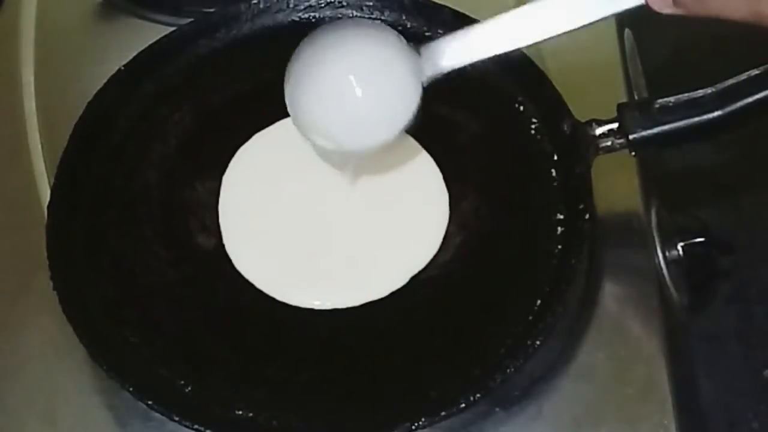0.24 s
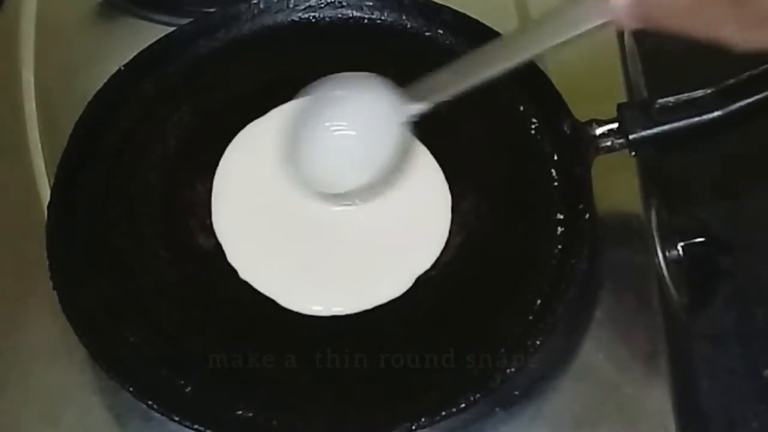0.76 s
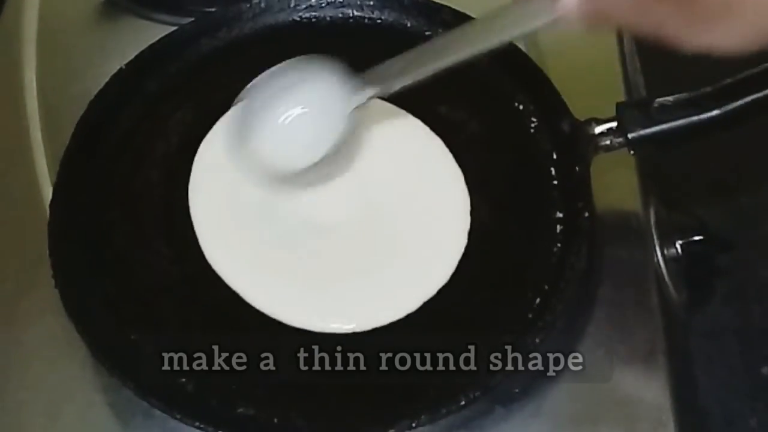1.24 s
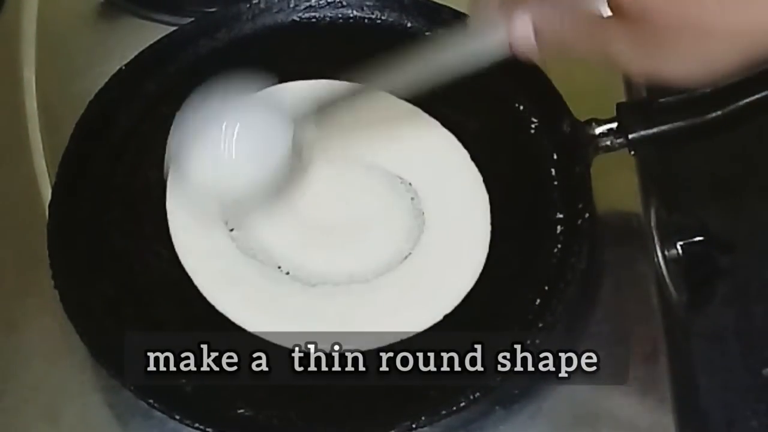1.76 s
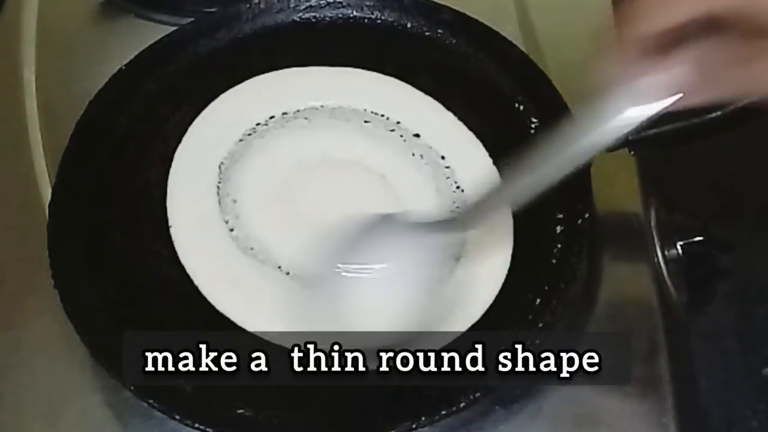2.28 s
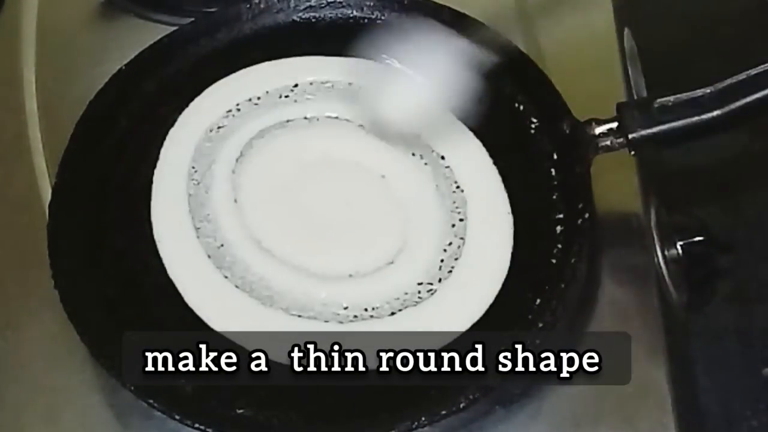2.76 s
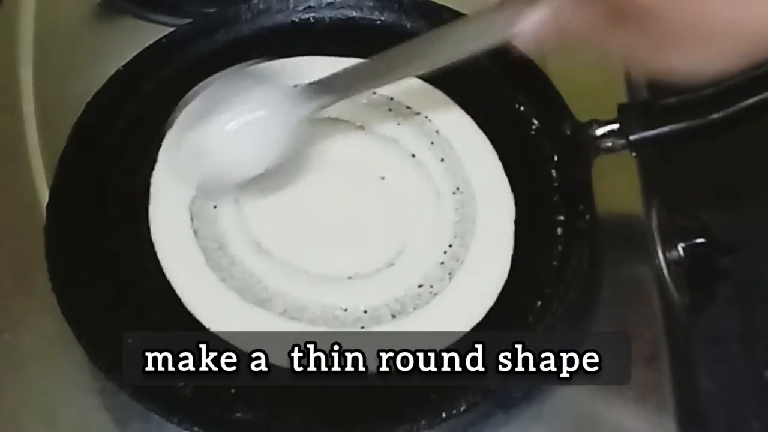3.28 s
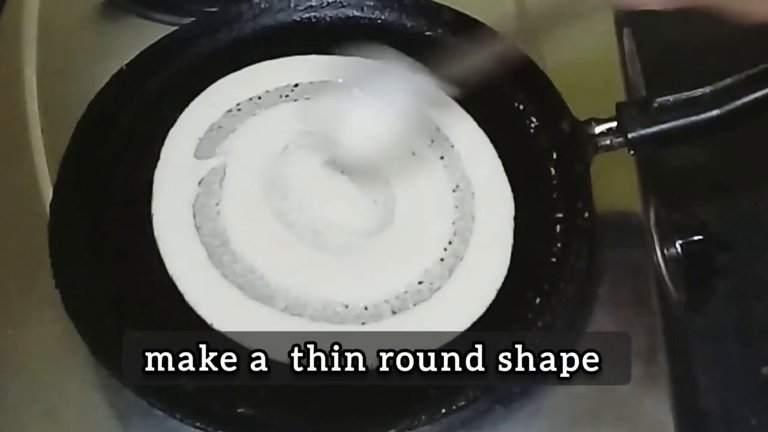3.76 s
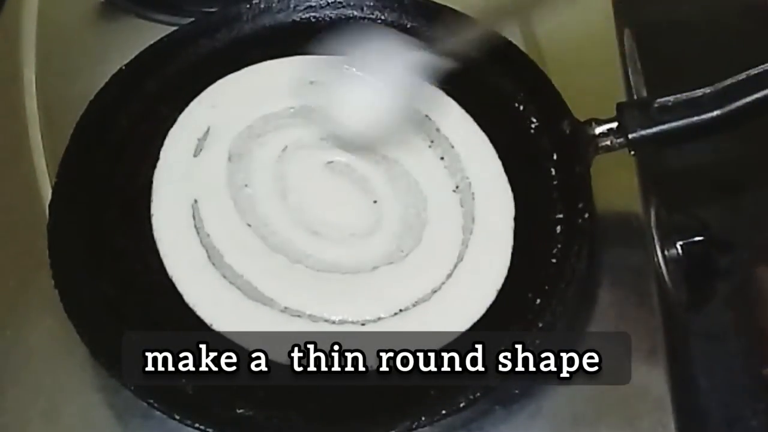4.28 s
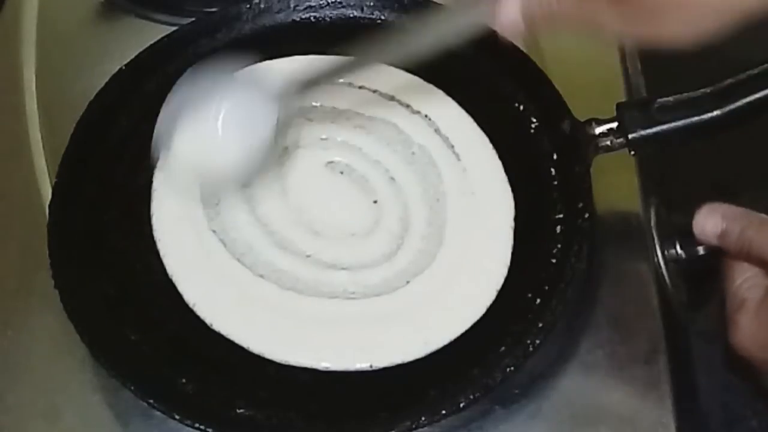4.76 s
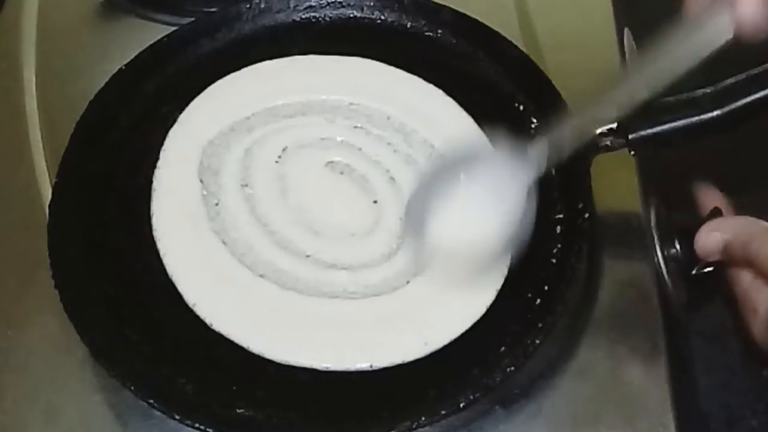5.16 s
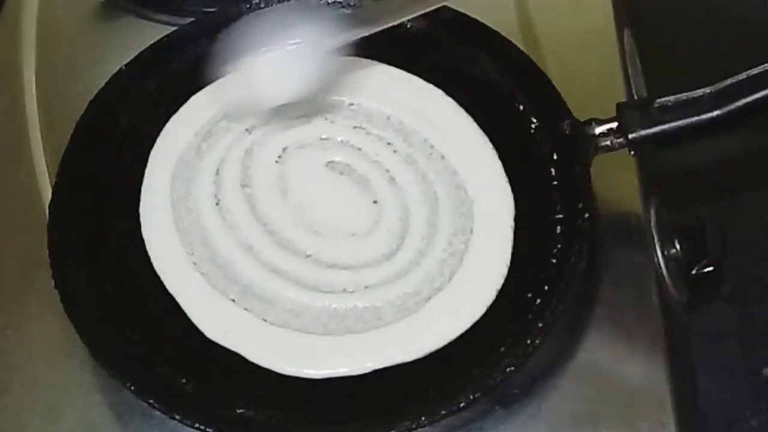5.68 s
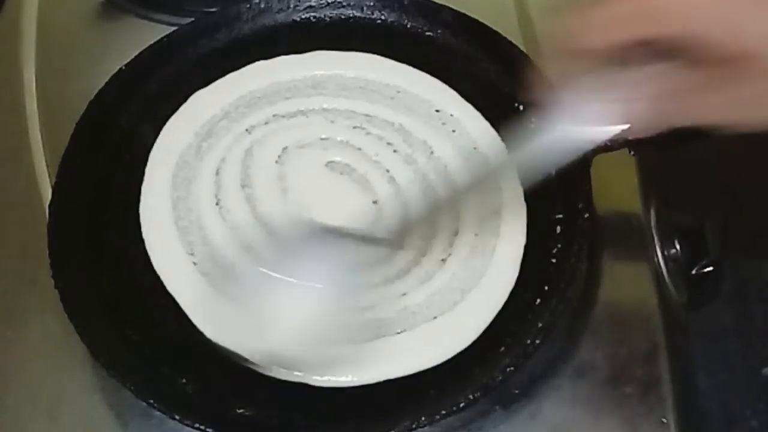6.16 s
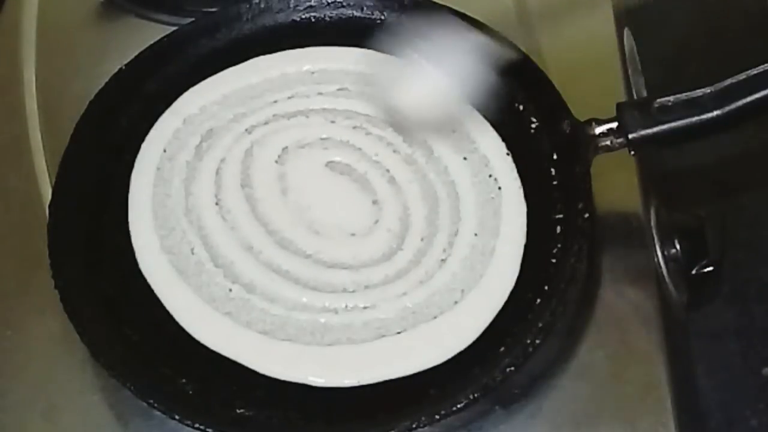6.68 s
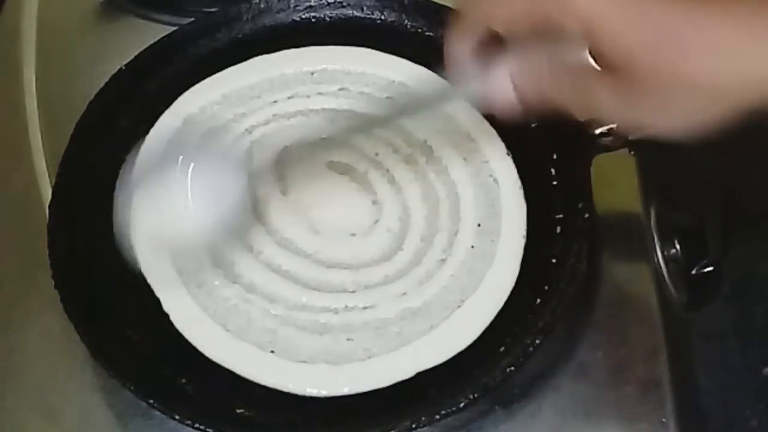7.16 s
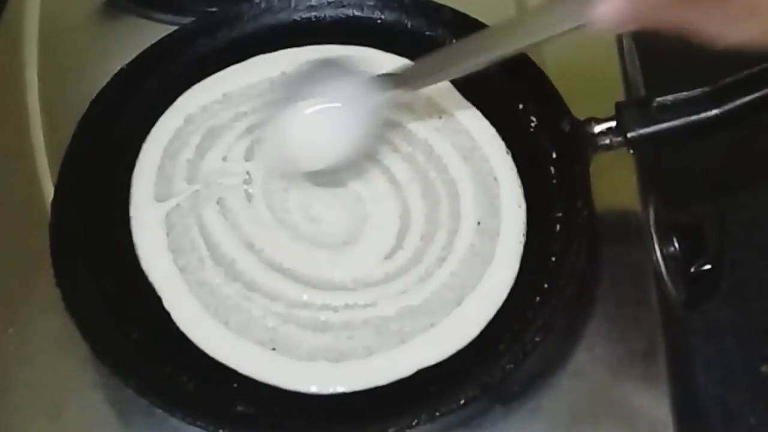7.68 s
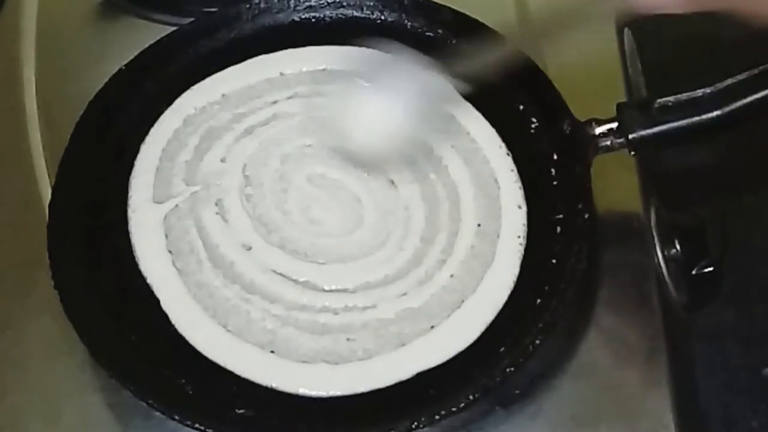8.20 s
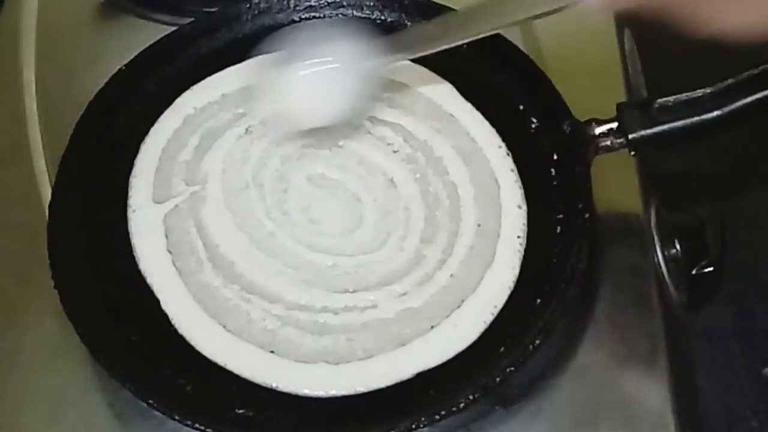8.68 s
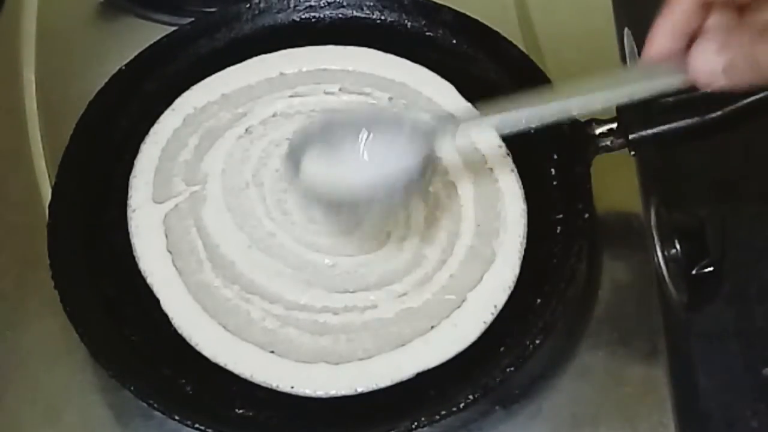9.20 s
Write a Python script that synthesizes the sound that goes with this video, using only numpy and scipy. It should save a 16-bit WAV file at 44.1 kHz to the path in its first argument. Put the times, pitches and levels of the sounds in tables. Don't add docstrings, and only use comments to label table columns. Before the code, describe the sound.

Close wet sizzling surges as batter spreads on hot iron, dies away, returns more softly in circular strokes, and ends in small dry ticks.

```python
import sys
import numpy as np
from scipy import signal
from scipy.fft import rfft, irfft, next_fast_len
from scipy.io import wavfile
from scipy.ndimage import uniform_filter1d, map_coordinates

SR = 44100
rng = np.random.default_rng(int(sys.argv[2]) if len(sys.argv) > 2 else 0)


def generate_wav(sig):
    pcm = np.round(np.clip(np.atleast_2d(sig).T, -1, 1) * 32767).astype(np.int16)
    wavfile.write(sys.argv[1], SR, pcm)


def amplitude_ratio(level_db):
    exponent = np.asarray(level_db, float) / 20
    return 10 ** exponent


N = 415863

# pitch_hz, density_db (per Hz)
KITCHEN_SPECTRUM = [(105, -25.5), (140, 1), (190, -14.5), (300, -2.5), (480, -16), (600, 2.5), (780, -6),
                    (900, -23.5), (1400, -22), (3000, -34.5)]
# start_s, peak_db, upper_db, lower_db
KNOCKS = [(0.056, -61, -0.5, -6), (0.092, -32.5, 5, -3.5), (0.199, -69, 28, -30), (1.028, -93, 39, -16),
          (1.278, -56, 4, -2), (1.5, -56, 8, -27), (1.692, -63, 5, -36), (1.545, -61, 0, -25),
          (1.6, -72, 8, -25), (1.778, -61, -15, -31), (1.85, -64, -11, -22), (1.909, -69, -11, -21),
          (2.163, -56, -21, -23), (2.289, -62, 0, -6), (2.554, -59, 16, -39), (2.83, -61, -18, -13),
          (3.013, -60, -25, -41), (3.27, -63, -30, -16), (3.33, -74, -20, -15), (3.846, -66, -42, -18),
          (4.051, -78, -20, -15), (4.44, -81.5, -1, -25), (5.062, -57, -3, -6), (5.089, -45, 1, 1),
          (5.139, -51, 1, -1), (5.181, -39, -15, -10), (5.342, -41, -32, -5), (5.379, -51, -25, -10),
          (5.518, -48, -36, -42), (5.571, -65, -30, -32), (5.633, -57, -29, 1), (5.747, -39, -36, -1),
          (5.876, -48.5, -2, 0), (6.026, -46, -7.5, -2), (6.09, -70, -15, 12), (6.394, -54.5, -40, 4),
          (6.538, -47, -54, -13), (6.6, -59, -30, -16), (6.718, -44.5, 1.5, -0.5), (6.78, -63, -20, 7),
          (6.923, -62, -23, -7), (7.162, -63, -35, -15), (7.348, -55, -33, -23), (7.599, -59, -8, -20),
          (7.633, -46, -12, -17), (8.066, -60, -39, -27)]
# start_s, level_db
FOOTSTEPS = [(.1, -59), (1.129, -62), (1.499, -77), (1.64, -87), (1.71, -78), (1.77, -84), (1.19, -62),
             (1.41, -87), (5.875, -75), (6.099, -76), (6.279, -65), (6.716, -84)]
# start_s, push_db
LADLE_BOUNCES = [
    (.0905, 27.5),
    (.0995, 25),
    (.119, 25.5),
    (.134, 16.5),
    (.142, 14.5),
    (.149, 15.5),
    (.160, 20.5),
    (.170, 16),
    (.203, 4),
]
# pitch_hz, width_hz, level_db
STAND_MODES = [(193, 108, -4.5), (239.5, 58, 5), (279, 71, -4.5)]
# pitch_hz, width_hz, level_db
UPPER_STAND_MODES = [(322, 130, 15), (447, 69, 14.5)]
# pitch_hz, width_hz, level_db
PAN_RING_MODES = [(655, 101, -0.5)]
# start_s, peak_db
FAT_SPARKS = [(3.4101, -35), (3.4956, -34), (3.5026, -31.5), (3.606, -37), (3.7882, -37), (3.833, -24.5),
              (4.0312, -39.5), (4.1283, -41), (4.1918, -43.5), (4.3993, -42.5), (4.4772, -36.5),
              (4.6373, -45.5), (4.759, -41), (4.7904, -37.5), (4.9755, -36.5), (5.414, -38.5),
              (5.7004, -25.5), (6.3873, -32.5), (6.7665, -29.5), (7.2773, -37.5), (7.399, -35.5),
              (7.5512, -37.5), (7.6465, -38.5), (7.7956, -34), (7.9081, -44), (7.9088, -37.5),
              (7.9667, -34), (7.9994, -39.5), (8.0072, -34.5), (8.2177, -39.5), (8.2234, -30.5),
              (8.2923, -38.5), (8.3855, -38.5), (8.5364, -42), (8.591, -41), (8.6327, -46.5),
              (8.6871, -41.5), (8.716, -40.5), (8.744, -38), (8.8063, -37.5), (8.9679, -50),
              (9.0378, -42.5), (9.0533, -35), (9.171, -43), (9.3616, -38.5)]
# start_s, peak_db
DROPLETS = [(3.4104, -28), (3.6576, -27), (4.393, -32), (4.6371, -32.5), (4.9307, -42), (5.036, -41),
            (8.2784, -30.5), (8.457, -33.5), (8.4632, -35), (8.4684, -33.5), (8.4943, -35), (8.4957, -29),
            (8.5434, -32), (8.556, -41.5), (8.6544, -34), (8.7364, -31.5), (8.7444, -38), (8.8153, -33.5),
            (8.8718, -33), (9.0264, -42), (8.9679, -41.5), (9.1708, -45), (9.197, -43.5), (9.311, -44.5),
            (9.322, -42.5), (9.331, -41)]
# start_s, peak_db, body_db
BUBBLES = [(0.4608, -23, -20.5), (0.479, -16.5, -21), (2.1015, -11, -20.5), (2.2404, -17.5, -7),
           (3.5027, -21.5, -20.5), (3.7883, -36, -16.5), (3.8318, -22.5, -30), (4.0322, -32.5, -17.5),
           (4.482, -28.5, -14), (4.7905, -45, -24), (4.884, -37.5, -21), (4.9747, -31.5, -26),
           (5.3447, -47, -20), (5.3737, -41, -28), (5.4146, -33, -21.5), (6.767, -32, -7.5),
           (7.9098, -26, -28.5), (8.219, -30, -24), (8.293, -32.5, -12), (8.3858, -39.5, -14),
           (8.5276, -34, -23), (8.6867, -35, -13), (8.7166, -35.5, -12.5), (8.8054, -35.5, -2.5),
           (8.489, -36.5, -15), (9.0536, -34, -14.5), (9.196, -39, -10), (9.2596, -40, -25.5),
           (9.3217, -36.5, -29), (9.3617, -36.5, -12)]
# start_s, steam_db, hum_over_steam_db
BOILING = [(0, -33, -7), (.45, -38, -10.5), (.68, -37.5, -34.5), (.88, -28.5, -13.5), (1.0, -26.5, -8.5),
           (2.2, -30.5, -4.5), (2.95, -28.5, -7), (3.35, -36.5, -14), (3.9, -43, -36), (4.75, -53.5, -58),
           (5.1, -53.5, -25.5), (5.27, -65.5, -21), (5.55, -39.5, -86), (5.67, -37, -10.5),
           (6.9, -34.5, -18.5), (7.2, -37, -24), (8.2, -48, -56), (9.43, -59.5, -40.5)]
# centre_s, half_length_s, steam_gain_db, hum_gain_db
LADLE_PASSES = [(0.098, .02, -2, 0), (.3, .1, 0, 1), (0.613, 0.039, -1, 7.5), (0.816, 0.038, 1, 0.5),
                (1.024, 0.044, 1, 1.5), (1.555, 0.12, 2.5, -2.5), (1.724, .06, 0, 2.5),
                (1.934, 0.096, 1, -6), (2.13, 0.18, 4.5, -6.5), (2.727, 0.18, 1.5, -8.5),
                (3.489, 0.089, 0.5, 6), (3.736, 0.049, 1, 17.5), (4.281, 0.061, -1, 26),
                (4.441, 0.19, 4.5, 7), (4.866, 0.017, -1, 0), (5.298, 0.04, -3.5, 0), (5.47, 0.036, 1, -7),
                (5.634, 0.037, 2.5, 6), (5.713, 0.062, 2.5, 2), (5.859, 0.16, -1.5, -12.5),
                (5.97, 0.2, 6, 2), (6.013, 0.025, 0, 8.5), (6.26, 0.09, -0.5, 6), (6.551, 0.12, 3.5, -5.5),
                (6.647, 0.056, 1, -6), (6.746, 0.12, 2.5, -0.5), (6.894, 0.03, 0.5, 6.5),
                (7.04, 0.034, -0.5, 4), (7.154, 0.089, -0.5, -8), (7.404, 0.18, 2, -0.5),
                (7.763, 0.075, 3.5, 7), (8.061, 0.11, 2.5, -3), (8.38, 0.047, -1.5, 3),
                (8.47, .03, -2.5, 0), (8.727, 0.18, 2.5, -2.5), (8.94, 0.097, -2, -5),
                (9.066, 0.034, 2, -3), (9.236, 0.044, 1.5, 2)]
# start_s, gain_db
SHADING = [(0, 2), (.6, 4), (.78, 4), (1.15, 2), (1.34, 0.5), (1.57, 1.5), (1.73, 2), (1.8, 2), (2.9, -1),
           (4.5, -1), (5.65, 5), (5.78, -0.5), (5.88, 2.5), (6.3, 1.5), (6.54, 3.5), (6.6, -0.5),
           (7.6, -1.5), (8.25, 2.5)]
# pitch_hz, density_db (per Hz)
STEAM_SPECTRUM = [(760, -34.5), (1300, -8), (1550, 2), (1630, -2), (2030, 2), (2540, -1), (3010, 1.5),
                  (3700, -4.5), (4190, -2), (4620, -5.5), (5190, -1), (6550, -2.5), (8340, -13),
                  (9040, -7.5), (11000, -15.5), (14300, -60), (22000, -120)]
# pitch_hz, density_db (per Hz)
SPIT_SPECTRUM = [(4700, -25.5), (8000, -4.5), (9060, -6), (11300, -12), (13000, -10.5), (13800, -15),
                 (14600, -3.5), (15000, 0.5), (15450, -3), (15700, -13.5)]
# pitch_hz, density_db (per Hz)
COARSE_SPECTRUM = [(500, -59), (800, -13), (880, 6), (1150, -6.5), (1350, -19), (1500, 6), (2200, -67)]
# pitch_hz, width_hz, level_db
GRIDDLE_MODES = [(1460, 86, -1.5), (3070, 250, -40), (4163, 480, 7), (5074, 390, 3.5), (6100, 120, -10),
                 (6820, 92, 8.5), (7800, 120, 8.5), (8610, 94, -13)]
# pitch_hz, width_hz, level_db
PAN_HUM_MODES = [(644.7, 42, -0.5), (708, 27, 1), (783.5, 82, -3.5), (465, 100, -9.5), (612, 22, -19.5)]
# pitch_hz, width_hz, level_db
FINE_PEAKS = [(1371, 22, 6), (1583, 34, 3), (1712, 21.4, 6.5), (1917, 14, 1.5), (2070, 15, 4),
              (2170, 7.5, 6.5), (2640, 15, 1.5), (3016, 43, -0.5), (3110, 30, 4.5), (3295, 13, 8.5),
              (4211, 20, 1.5), (4090, 20, -13), (4376, 29, 3), (4870, 11, -2), (5330, 45, 3),
              (5860, 34, 7.5), (6040, 55, -6.5), (6400, 89, 3), (5970, 29, 0), (6680, 55, 1),
              (7300, 90, 2.5), (7630, 50, 5.5), (8600, 90, 4)]
# pitch_hz, density_db (per Hz)
NOISE_ESTIMATE = [(40, -122), (300, -121), (480, -106), (700, -110), (1000, -114), (1500, -104),
                  (4500, -101), (7000, -111), (15000, -120)]
# pitch_hz, width_hz, first_db, relearnt_db
DRONE_BANDS = [(546, 164, 34, 32.5), (910, 92, 17, 10.5), (1317, 110, -14, -11), (1780, 390, 2, 9),
               (2190, 100, 6, 15), (2560, 170, -3, -12), (2950, 180, 2, 3), (3120, 170, 1, 13),
               (3440, 110, -5, -22), (3750, 70, 3, 7), (3920, 90, 0, 6), (4300, 290, 2, 7),
               (4580, 80, 12, 12), (4790, 290, 4.5, 8), (5200, 60, 5, 3), (5420, 92, -0.5, -4),
               (5980, 170, -4, 14)]
# start_s, lows_db, highs_db
ESTIMATE_CREEP = [(0, -26, 5), (.55, -7, -4), (.9, -21, 4), (2.6, -28, 4), (2.9, 3, 6), (3.5, -6.5, -1),
                  (4.2, -6, 2), (4.6, -5.5, -10), (4.8, 2, 10), (4.88, -6, 12), (4.95, -12, 7.5),
                  (5.03, -5, 7.5), (5.14, -11, 7.5), (5.25, -18, 5), (5.36, 1.5, 15), (5.45, 16, 10),
                  (5.75, 7.5, -3), (7, -5, -19), (8.0, -2, -12), (8.4, 5, -9), (8.86, 13, -14),
                  (8.95, 12, 2), (9.12, 14, 0), (9.2, 16, 10.5), (9.3, 22.5, 7), (9.35, 16, 0.5),
                  (9.43, 13, 3)]
# start_s, end_s, lowest_hz, highest_hz
UNLIKE_TREBLE = [(0, 1.055, 12230, 13800), (1.13, 1.156, 12400, 14400), (1.288, 1.5, 12300, 14200),
                 (1.754, 2.166, 10800, 14300), (2.19, 3.541, 10150, 14500), (3.6, 3.833, 10000, 14600),
                 (1.24, 1.266, 4600, 5700), (1.637, 1.66, 4100, 6300), (2.22, 2.257, 7040, 9400),
                 (2.226, 2.257, 5300, 5560), (3.05, 3.09, 6460, 7100), (3.803, 3.83, 4130, 6400),
                 (4.626, 4.634, 6000, 9050), (4.777, 4.788, 4600, 15500), (8.46, 8.5, 6000, 13700)]


def unit(x):
    return x / np.sqrt(np.mean(x ** 2) + 1e-30)


def along(points, hz):
    f, v = np.transpose(points)
    return np.interp(np.log(hz + 1), np.log(f + 1), v)


def filtered(x, response):
    m = next_fast_len(N + 8192)
    return irfft(rfft(x, m) * response(np.fft.rfftfreq(m, 1 / SR)), m)[..., :N]


def modes(table):
    def response(f):
        total = 0
        for k, (c, w, db) in enumerate(table):
            total = total + (-1) ** k * amplitude_ratio(db) * 1j * f * w / (c * c - f * f + 1j * f * w)
        return total
    return response


def wobble(rate):
    knots = rng.standard_normal(int(N * rate / SR) + 4)
    return map_coordinates(knots, [np.arange(N) * rate / SR])


def fizz(per_second, spread_db, share):
    size = amplitude_ratio(spread_db * np.clip(rng.standard_normal(N), -2, 2))
    bursts = (rng.random(N) < per_second / SR) * size * np.sign(rng.standard_normal(N))
    share = np.clip(share, 0, 1)
    return np.sqrt(1 - share) * rng.standard_normal(N) + np.sqrt(share) * unit(bursts)


def patchy(x, depth_db):
    z = signal.stft(x, nperseg=512)[2]
    field = uniform_filter1d(uniform_filter1d(rng.standard_normal(z.shape), 6, 0), 10, 1)
    return signal.istft(z * amplitude_ratio(depth_db * unit(field)), nperseg=512)[1][:N]


def impulses(times, gains):
    push = np.zeros(N)
    push[np.round(np.asarray(times) * SR).astype(int)] = gains
    return push


def puffs(times, gains, t60, rise, tail_db):
    push, t = impulses(times, gains), np.arange(SR // 3) / SR
    shape = amplitude_ratio(tail_db - 60 * t / t60) * (1 - np.exp(-t / rise))
    return push + signal.fftconvolve(push, shape)[:N] * rng.standard_normal(N)


def kitchen_hum():
    return amplitude_ratio(-97) * unit(filtered(rng.standard_normal(N), lambda f: amplitude_ratio(along(KITCHEN_SPECTRUM, f))))


def knocks():
    t = np.arange(SR // 2) / SR
    parts = STAND_MODES, UPPER_STAND_MODES, [(146.5, 51, 0)], [(55, 45, 0)]
    blows = []
    for s, db, upper_db, lower_db in KNOCKS:
        floor_db = lower_db - 26.5 + 8.5
        blows.append((s, db, amplitude_ratio(np.array([3, upper_db + 3.5, lower_db + 4.0, floor_db]))))
    for s, db in FOOTSTEPS:
        blows.append((s, db, np.array([0, 0, 0, amplitude_ratio(5.5)])))

    swell = np.zeros((4, N + len(t)))
    for s, db, share in blows:
        rise = np.clip(.006 + 0.0046 * (-28.5 - db), .011, .036)
        decay = amplitude_ratio(db - 60 * t / .21)
        trembling = amplitude_ratio(db - 21.5 - 60 * t / 0.51)
        shape = np.hypot(decay, trembling) * (1 - np.exp(-(t / rise) ** 2))
        swell[:, round((s - .4 * rise) * SR):][:, :len(t)] += shape * share[:, None]
    rattle = [unit(filtered(fizz(78, spread_db=-2.5, share=0.95), lambda f: modes(part)(f) ** 2))
              for part in parts]

    bounce_s, push_db = np.transpose(LADLE_BOUNCES)
    ring = puffs(bounce_s, amplitude_ratio(push_db), t60=0.12, rise=0.004, tail_db=-34.5)
    ring = filtered(ring, lambda f: modes(PAN_RING_MODES)(f) ** 2)
    start_s, peak_db = np.transpose(KNOCKS)[:2]
    contact = impulses(start_s, amplitude_ratio(peak_db + 42))
    contact = filtered(contact, lambda f: modes(STAND_MODES)(f) * modes([(240, 200, 0)])(f))
    return (swell[:, :N] * rattle).sum(0) + ring + contact


def sparks():
    s, db = np.transpose(FAT_SPARKS)
    push = impulses(s + .001, amplitude_ratio(db + 11))
    return filtered(push, lambda f: modes([(9500, 9000, 0)])(f) ** 2 + modes([(15000, 1500, 0)])(f))


def droplets():
    s, db = np.transpose(DROPLETS)
    snaps = puffs(s + .001, amplitude_ratio(db + 12), t60=.012, rise=0.00026, tail_db=-10.5)
    return filtered(snaps, lambda f: modes([(4900, 4500, 0)])(f) ** 2)


def pops():
    s, db, body_db = np.transpose(BUBBLES)
    s = s + .0012
    bright = lambda f: modes([(5600, 7000, 0)])(f) ** 2 - modes([(15000, 1200, -10)])(f)
    tick = filtered(puffs(s, amplitude_ratio(db + 6.5), t60=0.032, rise=.0003, tail_db=-10.0), bright)
    body = puffs(s, amplitude_ratio(db + body_db + 16.0), t60=0.018, rise=.0003, tail_db=-20.0)
    body = filtered(body, modes([(3150, 2500, 0.0038)]))
    echo = filtered(puffs(s + .0072, amplitude_ratio(db - 2.5), t60=.03, rise=0.0013, tail_db=-9), bright)
    return tick + body + echo


def steam_colour():
    ripple_db = .6 * rng.standard_normal(900)

    def colour(f):
        fine_db = np.interp(f / 25, np.arange(900), ripple_db)
        for c, w, db in FINE_PEAKS:
            fine_db = fine_db + db * np.exp(-((f - c) / w) ** 2)
        return amplitude_ratio(along(STEAM_SPECTRUM, f) + fine_db) * (0.89 + 0.49 * abs(modes(GRIDDLE_MODES)(f)))
    return colour


def sizzle():
    t = np.arange(N) / SR
    s, *cols = np.transpose(BOILING)
    steam_db, slack_db = [np.interp(t, s, c) for c in cols]
    for s, half, gain_db, hum_gain_db in LADLE_PASSES:
        swell = np.exp(-((t - s) / half) ** 2)
        steam_db, slack_db = steam_db + gain_db * swell, slack_db + hum_gain_db * swell

    fresh = 1 / (1 + np.exp(np.clip((t - 0.82) / .05, -50, 50)))
    spit_floor_db = np.minimum(-59, steam_db - 5.5)
    spit_gain = np.hypot(amplitude_ratio(steam_db - 10.5 + 7.5 * fresh), amplitude_ratio(spit_floor_db)) * amplitude_ratio(1.8 * wobble(12))
    hum_db = steam_db + slack_db + 2 * wobble(24)
    sparse = np.clip((-38.0 - steam_db) / 14, 0, 1)
    coarse_db = steam_db - 18 + 0.13 * slack_db + 0.36 * wobble(8.7) - sparse
    surge_db = (.3 + .9 * sparse) * wobble(22) + (.35 + 1.3 * sparse) * wobble(48)

    colour = steam_colour()
    steam = unit(patchy(filtered(fizz(1500, spread_db=4, share=.15), colour), depth_db=.7))
    bright = filtered(steam, lambda f: np.exp(-(np.log2((f + 1) / 5600) / 0.83) ** 2))
    steam = steam + (amplitude_ratio(np.interp(t, *np.transpose(SHADING))) - 1) * bright
    spit = filtered(fizz(500, spread_db=4, share=0.15), lambda f: amplitude_ratio(along(SPIT_SPECTRUM, f)))
    spit = unit(patchy(spit, depth_db=1.))
    coarse = filtered(rng.standard_normal(N), lambda f: amplitude_ratio(along(COARSE_SPECTRUM, f)))
    coarse = unit(patchy(coarse, depth_db=2.0))
    hum = unit(filtered(fizz(110, spread_db=-5.5, share=0.057), lambda f: modes(PAN_HUM_MODES)(f) ** 2))
    crackle = unit(filtered(fizz(70, spread_db=-13.5, share=0.67), colour))

    boiling = amplitude_ratio(steam_db + surge_db) * steam + spit_gain * amplitude_ratio(surge_db) * spit + amplitude_ratio(coarse_db) * coarse
    boiling = boiling + 0.27 * sparse * amplitude_ratio(steam_db) * crackle
    no_bass = lambda f: 1 / (1 + (430 / (f + 1)) ** 8)
    return filtered(boiling + amplitude_ratio(hum_db) * hum, no_bass)


def scene():
    return np.tile(knocks() + sparks() + droplets() + pops() + sizzle(), (2, 1))


def suppress(x, ragged_db, depth_db, steep):
    hz, t, z = signal.stft(x, SR, nperseg=1024, noverlap=768, scaling="psd")
    power = abs(uniform_filter1d(uniform_filter1d(abs(z) ** 2, 12, 1), 3, 0)) * 2 + 1e-30
    relearnt = 1 / (1 + np.exp(np.clip((5 - t) / 0.084, -50, 50)))
    drones_db = 0
    for c, w, db, later_db in DRONE_BANDS:
        drones_db = drones_db + np.outer(np.exp(-((hz - c) / w) ** 2), db + (later_db - db) * relearnt)
    drift = uniform_filter1d(uniform_filter1d(rng.standard_normal(z.shape), 4, 0), 28, 1)
    s, lows_db, highs_db = np.transpose(ESTIMATE_CREEP)
    tilt = np.outer(np.clip(hz / 1400 - 1, 0, 1), np.interp(t, s, highs_db - lows_db))
    creep_db = (np.interp(t, s, lows_db) + tilt) * ((hz > 350) & (hz < 6500))[:, None]
    learnt_db = along(NOISE_ESTIMATE, hz)[:, None] + drones_db + creep_db + ragged_db * unit(drift)
    learnt = amplitude_ratio(learnt_db) ** 2
    gain_db = np.maximum(-steep * np.log1p((learnt / power) ** 2), depth_db)
    z = z * amplitude_ratio(uniform_filter1d(gain_db, 9, 1))
    return signal.istft(z, SR, nperseg=1024, noverlap=768, scaling="psd")[1][:N]


def unlike_channels(mid):
    hz, t, z = signal.stft(mid, SR, nperseg=512)
    block = np.arange(len(t)) // 5
    low, high = rng.standard_normal((2, len(t)))[:, block] * [[.07], [.03]] + 1
    unlike = 0
    for start, end, low_hz, high_hz in UNLIKE_TREBLE:
        band = (hz[:, None] > low_hz * low) * (hz[:, None] < high_hz * high)
        unlike = unlike + band * (t > start) * (t < end)
    unlike = np.minimum(1, unlike)
    mid = signal.istft(z * (1 - 0.41 * unlike), SR, nperseg=512)[1][:N]
    random_phase = np.exp(2j * np.pi * rng.random(z.shape))
    side = signal.istft(amplitude_ratio(-3) * z * unlike * random_phase, SR, nperseg=512)[1][:N]
    return np.array([mid + side, mid - side])


def band_limit(x):
    return signal.sosfilt(signal.butter(12, 16790, fs=SR, output="sos"), x)


def record(dry):
    gated = suppress(dry[0], ragged_db=2.5, depth_db=-48, steep=28)
    mid = filtered(gated + kitchen_hum(), lambda f: f < 15600)
    return band_limit(unlike_channels(mid))


dry = scene()
out = record(dry)
generate_wav(out)
```